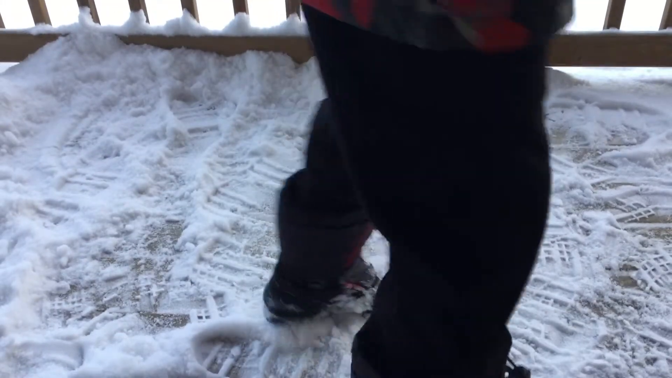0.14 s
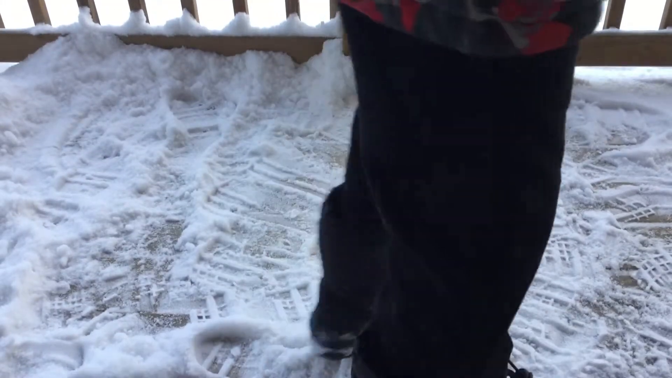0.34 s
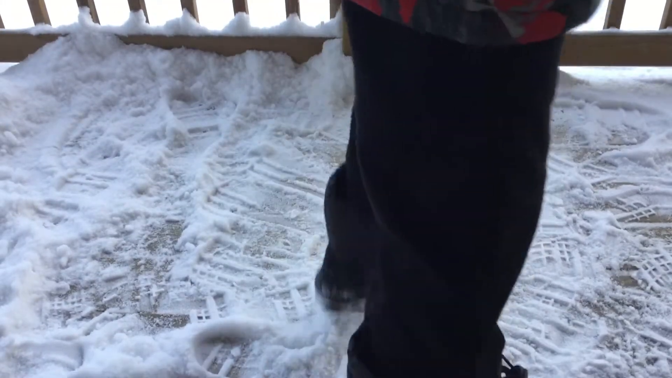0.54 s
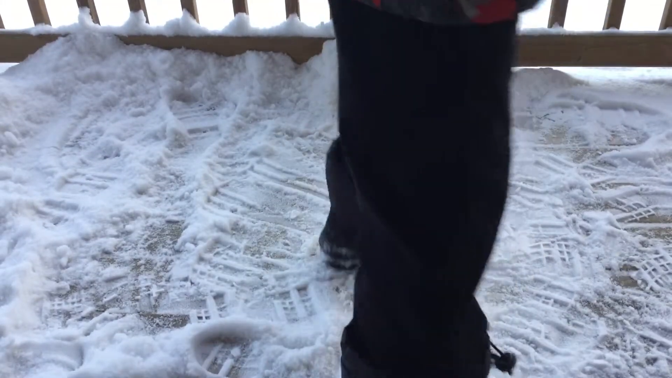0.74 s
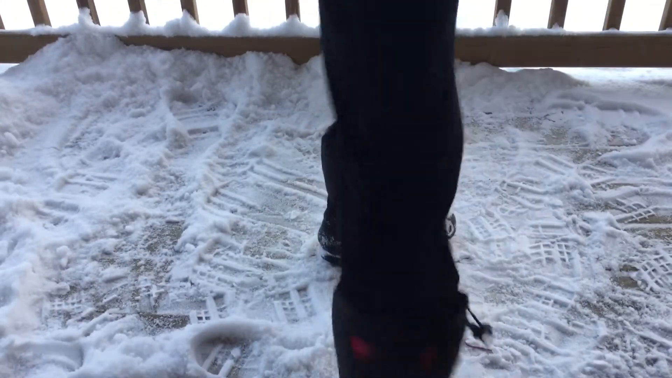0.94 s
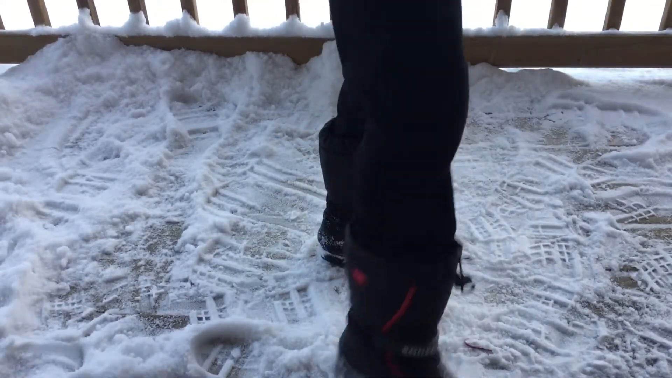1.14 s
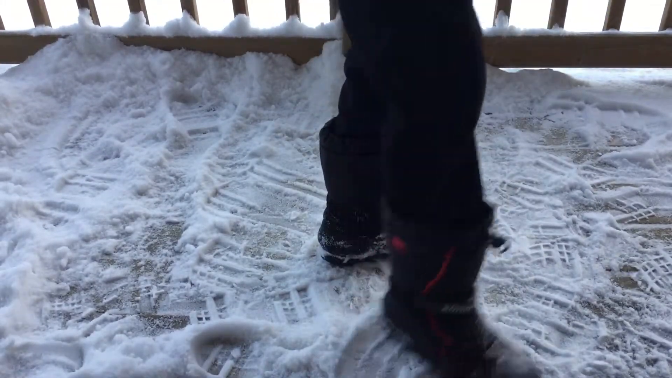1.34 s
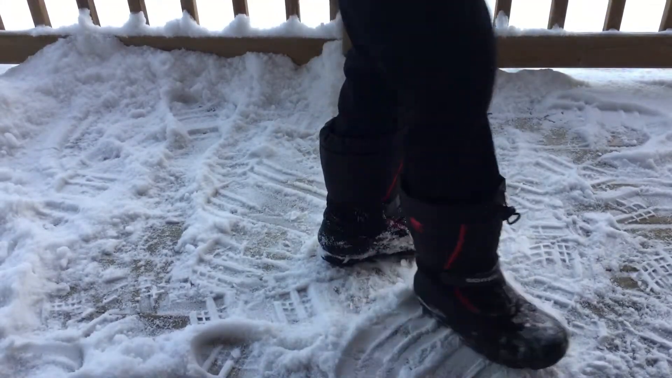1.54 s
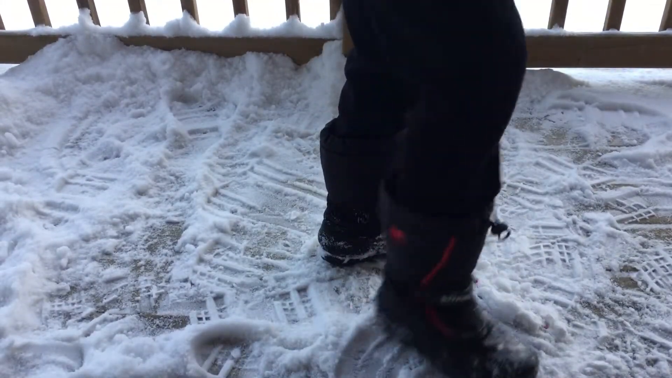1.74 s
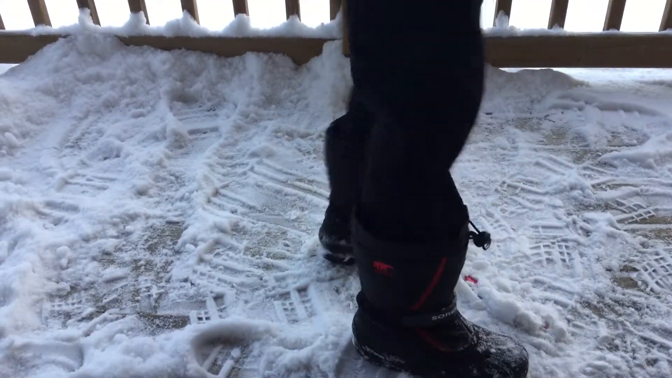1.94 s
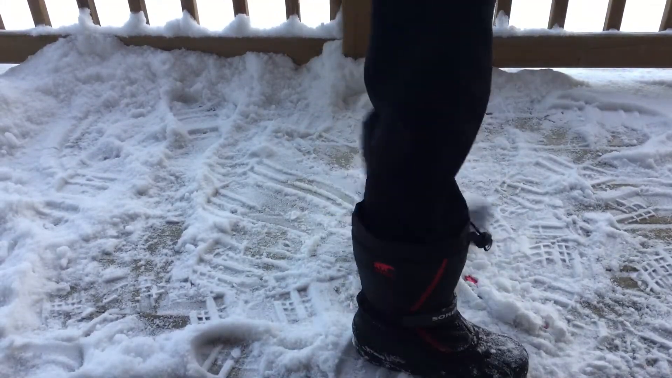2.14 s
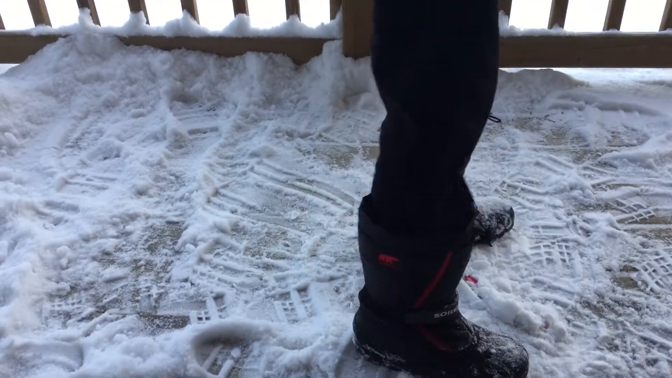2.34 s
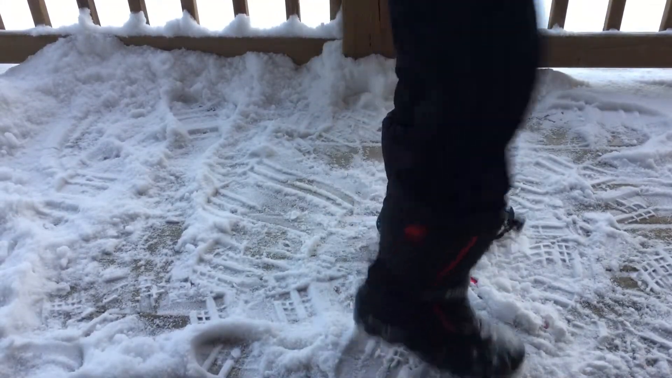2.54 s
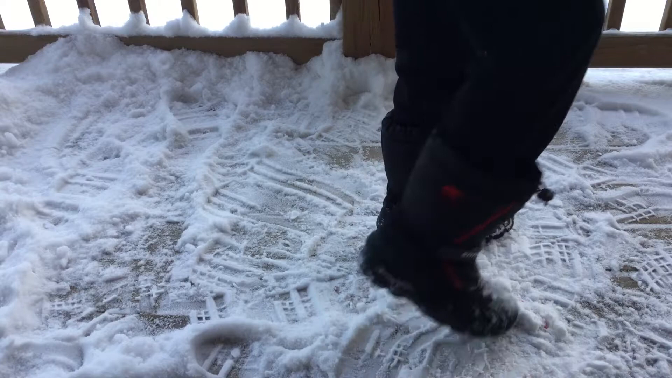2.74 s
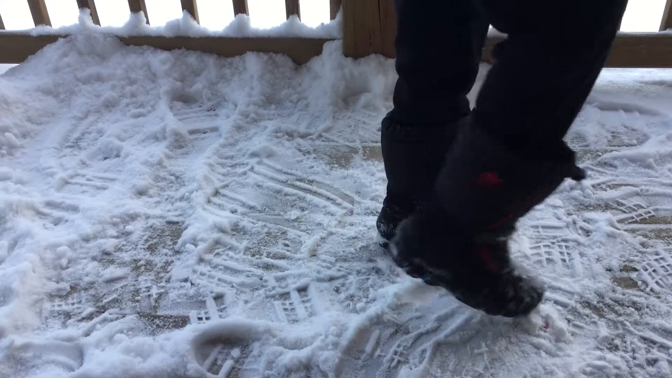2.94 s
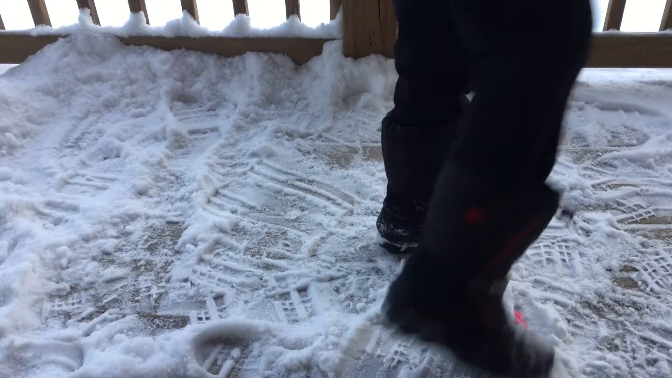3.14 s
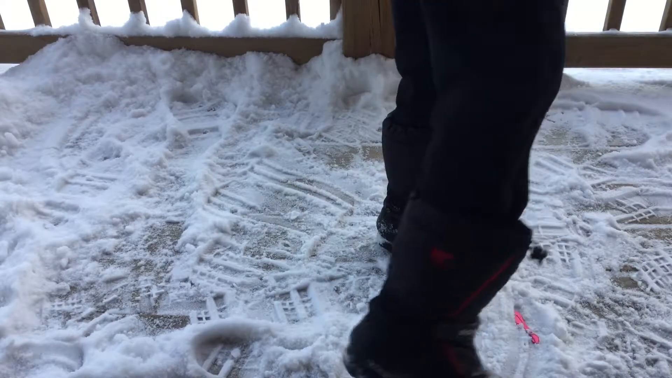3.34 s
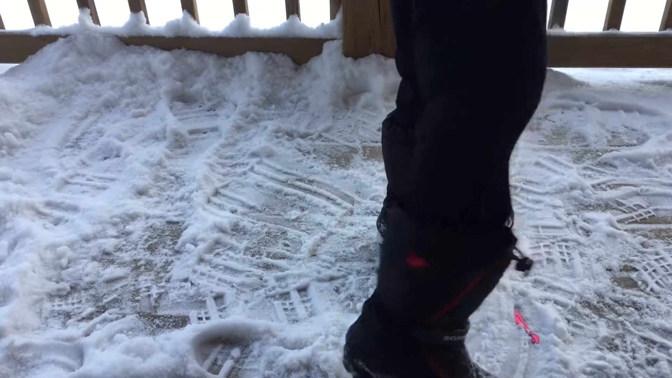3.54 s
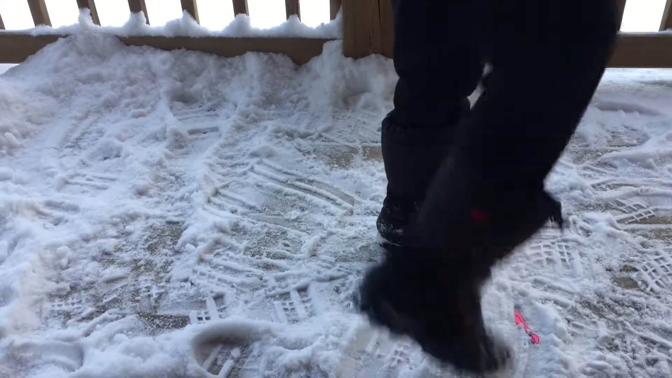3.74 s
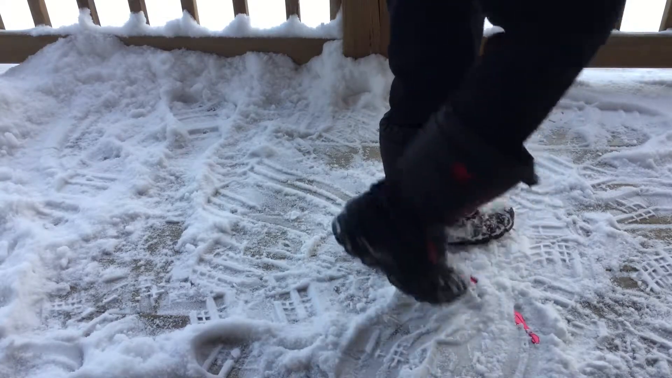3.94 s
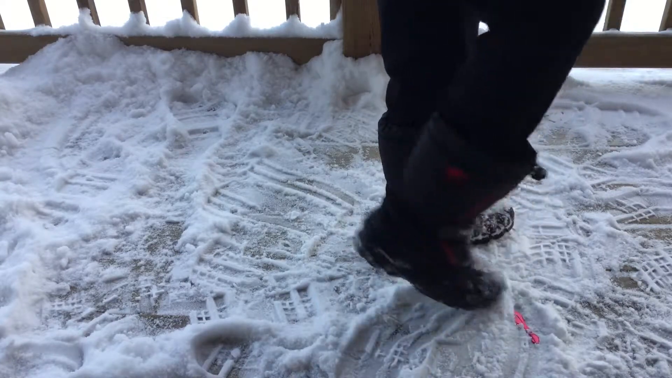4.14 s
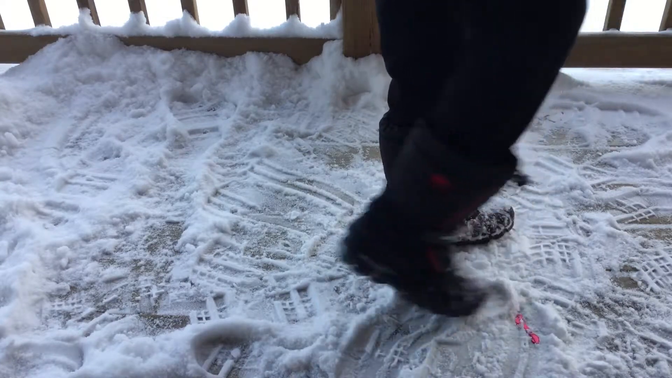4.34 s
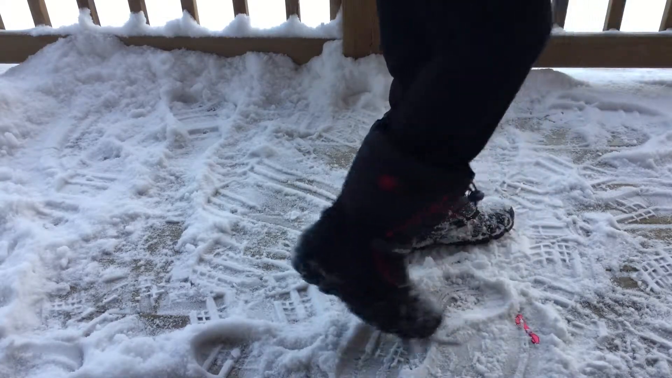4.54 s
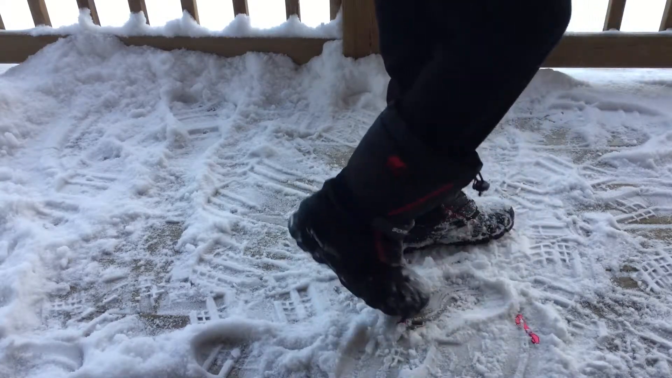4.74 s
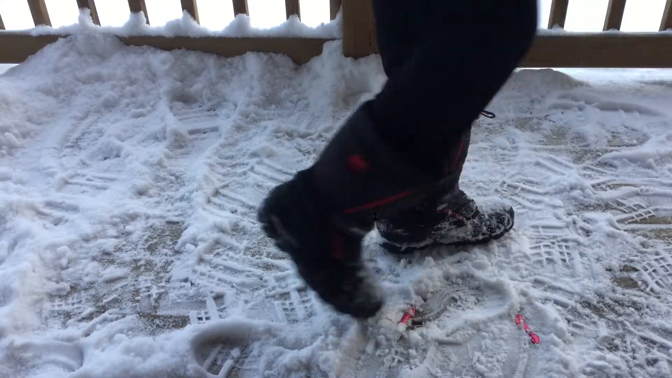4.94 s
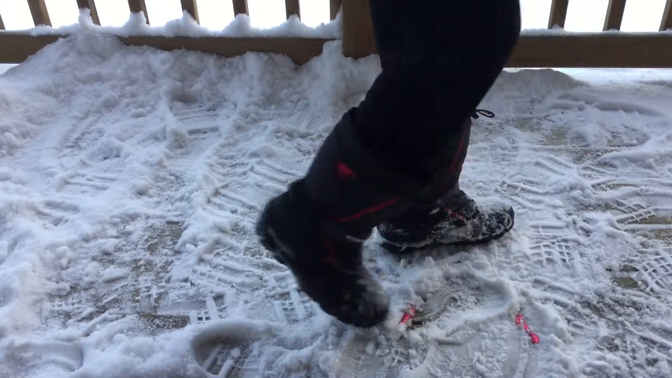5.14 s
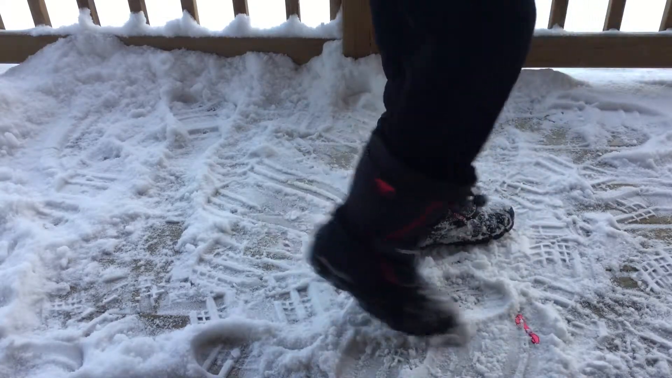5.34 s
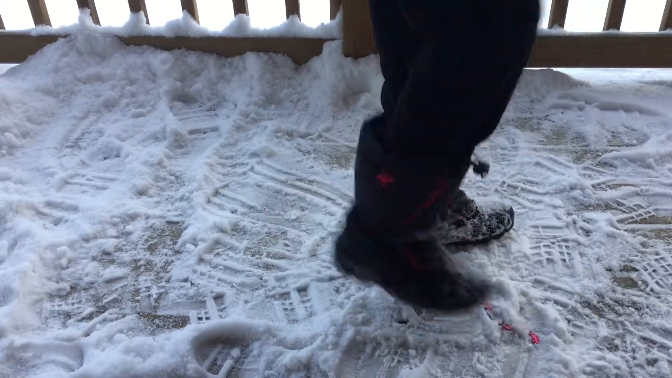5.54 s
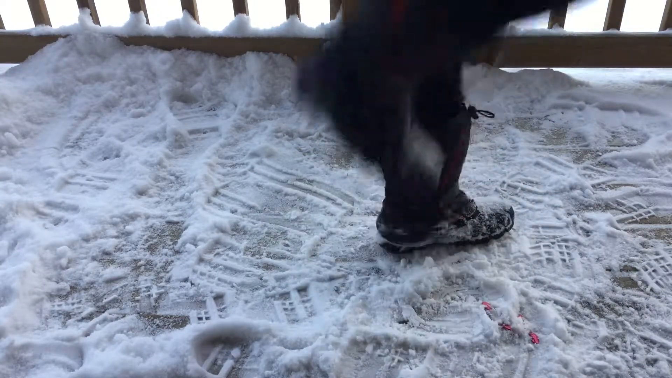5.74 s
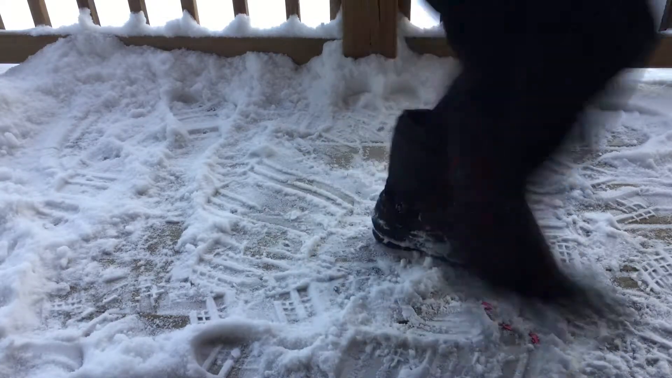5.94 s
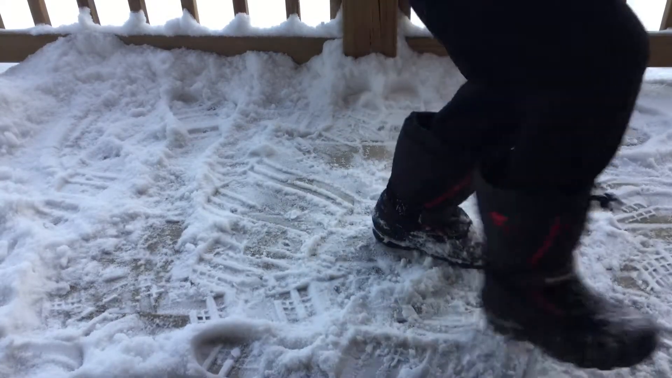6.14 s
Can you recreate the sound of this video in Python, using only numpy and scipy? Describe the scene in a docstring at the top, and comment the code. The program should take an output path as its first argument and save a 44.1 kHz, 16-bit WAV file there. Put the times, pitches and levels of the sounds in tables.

```python
"""Distant traffic rumbles throughout, as flickering noise bands, while snow boots shuffle on a snowy wooden deck.
From the first thud on, soles drag and crush snow (clumped random grains), crust snaps (short bright noise),
and footfalls ring the planks (soft pushes into decaying sines). Near 6 s the boots stamp on a small
folding knife, which clacks (short ringing modes); the stamp overloads the microphone."""
import sys
import numpy as np
from scipy import signal
from scipy.io import wavfile

SR = 44100
rng = np.random.default_rng(int(sys.argv[2]) if len(sys.argv) > 2 else 0)


def master_out(mix):
    """Clip the mix to full scale and print it as 16-bit PCM to the path in sys.argv[1]."""
    frames = np.transpose(np.atleast_2d(mix))
    ceiling = np.clip(frames, -1, 1)
    pcm = np.round(ceiling * 32767).astype(np.int16)
    wavfile.write(sys.argv[1], SR, pcm)


N = 277389

# colour of the far road noise: [f/Hz, relative density level/dB]
TRAFFIC_SPECTRUM = [(15, -37), (25, -25), (59, 3), (86, 1.5), (140, -2), (188, -7), (267, -7.5),
                    (631, -15.5), (826, -11.5), (945, -17), (1490, -23), (3530, -52), (7500, -61.5),
                    (14300, -55), (15500, -60)]
TRAFFIC_DB = -31  # level around which the traffic swells

# pushes and drags of a sole through snow: [peak t/s, swell t/s, fade t/s,
# crushing level/dB, grit level/dB, fine spray level/dB, load on the planks level/dB]
SCUFFS = [(.05, 0.019, 0.14, -30, -42.5, -38.5, -48), (.30, 0.27, 0.39, -54, -60.5, -60, -34),
          (.79, 0.28, 0.34, -41.5, -53.5, -53.5, -28.5), (.87, 0.21, 0.13, -39, -65, -55, -23.5),
          (.95, 0.081, 0.37, -34, -45, -50.5, -29.5), (1.054, 0.047, 0.29, -31.5, -41.5, -48, -33),
          (1.19, 0.28, 0.18, -34, -42, -47, -38.5), (1.39, 0.32, 0.13, -28, -39, -47.5, -31),
          (1.50, .2, 0.22, -40.5, -52.5, -49.5, -31.5), (1.894, 0.006, 0.077, -32, -45.5, -51, -32),
          (1.95, 0.094, 0.18, -36.5, -53, -52.5, -30.5), (2.06, .1, 0.047, -37, -63, -52.5, -23),
          (2.244, 0.022, 0.076, -34.5, -45, -46, -37), (2.28, 0.058, 0.034, -32, -54, -46, -33),
          (2.42, .03, 0.073, -51, -70, -63, -46), (2.57, .15, 0.13, -63, -72, -62, -51),
          (2.71, 0.13, .15, -72, -82, -61.5, -57), (3.0, 0.28, .2, -50, -64, -62, -39),
          (3.15, 0.13, 0.13, -39, -50, -51, -40), (3.215, 0.086, 0.17, -34.5, -46.5, -42.5, -31.5),
          (3.295, .08, .05, -38, -46, -58, -35), (3.36, .1, .15, -49, -62, -56, -38),
          (3.50, 0.2, 0.14, -35, -52, -53, -36), (3.718, 0.083, .06, -43, -59, -55, -38),
          (3.82, 0.19, 0.4, -44, -62, -59.5, -43.5), (4.28, 0.074, 0.24, -46, -61, -69, -30.5),
          (4.36, 0.033, .2, -38.5, -69, -70, -27.5), (4.44, 0.11, 0.23, -31.5, -40, -44, -26.5),
          (4.535, 0.12, 0.1, -36, -42.5, -40, -38), (4.631, 0.18, 0.046, -34, -52, -50.5, -25),
          (4.835, 0.025, .2, -40.5, -56, -80, -32), (4.97, .15, 0.44, -48.5, -75, -66, -37),
          (5.266, .01, 0.41, -45, -53, -50, -35), (5.395, 0.12, .1, -31, -38.5, -40, -29),
          (5.71, .2, 0.22, -43.5, -55, -52, -40), (5.90, 0.14, 0.21, -44, -47.5, -46.5, -38),
          (5.975, 0.027, 0.13, -26, -29.5, -28.5, -60), (6.05, .02, 0.11, -22.5, -39, -40, -60),
          (6.127, .01, 0.16, -43, -49, -43, -60)]
# snow and planks under standing boots: [crushing level/dB, grit level/dB, spray level/dB, load level/dB]
STANDING_LEVELS = (-52.5, -67, -87, -43)
SWELL_DB = 20  # a scuff gains this much over its swell and loses it over its fade

# colours of snow under the sole, coarse to fine: [f/Hz, relative density level/dB]
CRUSH_SPECTRUM = [(400, 4), (700, 5), (1150, 7), (1800, 2.5), (2600, -10), (4000, -42)]
GRIT_SPECTRUM = [(1800, 3), (2800, 1), (4000, -1.5), (6000, -12.5), (7500, -10.5), (9000, -21.5)]
SPRAY_SPECTRUM = [(5000, -6.5), (7400, -6), (8600, -2.5), (13000, -3), (17000, 3)]

# ringing modes of planks and joists: [f/Hz, level/dB, t60/s after a footfall]
DECK_MODES = [(33.6, -19, 0.12), (43.1, 1.5, 0.27), (53.15, 5, 0.48), (66.6, -6.5, 0.25), (85.4, -5, 0.8),
              (110.8, -4.5, 0.34), (117.5, 4, 0.45), (136.2, 4, 0.4), (158.2, 0, 0.4), (176.3, -0.5, 0.43),
              (201, 0, 0.23), (239.4, 0.5, 0.29), (292.9, 1, 0.17), (335.8, -1, 0.24), (359.8, -1.5, 0.28),
              (407.4, -3.5, 0.27), (488.3, -11.5, 0.25), (557, -5.5, 0.14), (623, -6.5, 0.31),
              (725, -6, 0.12), (830, -36, 0.41), (1010, -18, 0.36), (1157, 6.5, 0.074), (1440, -13, 0.13),
              (2000, -23, .05)]

# single crust snaps: [t/s, level/dB]
SNAPS = [(0.045, -40), (0.0697, -31), (0.797, -50), (0.852, -52), (0.909, -45), (1.045, -31), (1.1454, -43),
         (1.395, -41), (2.058, -48), (2.411, -47), (2.4214, -56), (3.289, -44), (4.0664, -56),
         (4.2832, -53), (4.4034, -37), (5.953, -25), (5.9706, -12.5), (6.037, -6), (6.127, -34)]

# footfalls: [t/s, blow level/dB, contact low-pass f/Hz, extra weight on the joists level/dB,
# snow burst level/dB, burst t60/s, board under the sole f/Hz, its knock level/dB]
FALLS = [(0.0456, -19, 252, 3.5, -25, 0.16, 130, -0.5), (0.794, -44, 400, -25, -37, .04, 297, -20),
         (0.851, -49, 400, -15, -25.5, 0.05, 276, -8.5), (1.89, -46, 300, -17, -43, 0.1, 188, -13),
         (2.057, -40, 450, -18, -42, 0.046, 315, -13.5), (2.237, -19.5, 260, -9.5, -57, 0.2, 179, -3.5),
         (2.412, -32, 603, -25, -44, .04, 341, -9.5), (3.199, -35, 300, -4, -41, 0.09, 200, -14),
         (4.437, -47, 400, -15, -26, 0.13, 244, -16), (4.618, -40, 450, -15, -48, 0.069, 370, -33),
         (4.829, -28, 300, -22, -52, 0.067, 264, -11), (5.224, -43, 200, -9, -55, .05, 113, -23.5),
         (5.325, -43, 450, -8, -28, 0.061, 297, -16), (5.954, -25, 350, -4, -15.5, 0.056, 128, -10),
         (5.971, -12, 356, -14, -8.5, 0.086, 123, -5), (6.014, -20, 119, 11, -38, 0.046, 102, -7),
         (6.035, -21, 2500, -25, -2.5, 0.044, 1022, 8.5), (6.036, -1, 710, -1.5, -7.5, 0.06, 157.4, 17)]
# colour of snow bursting under a footfall: [f/Hz, relative density level/dB]
BURST_SPECTRUM = [(300, 25.5), (1000, 7.5), (2500, -9), (5000, -9), (7600, -22), (8600, -43), (16000, -28)]
JOISTS_BELOW_HZ = 130
BENDING_S = .004  # travel time of a 100 Hz bending wave along the planks, growing as pitch falls
KNOCK_CYCLES = 11.9  # cycles in the knock's t60: boot and snow damp the loaded board

# blows on the knife under the sole: [t/s, level/dB]
KNIFE_BLOWS = [(5.953, -23), (5.9698, -13.5)]
# ringing modes of the small folding knife: [f/Hz, level/dB, t60/s]
KNIFE_MODES = [(1764, 3, 0.026), (3020, -8, 0.016), (4800, -6.5, 0.016), (6540, -8, .015)]

# narrow dip in the treble of the whole sound, and the top cut
TREBLE_DIP_HZ, TREBLE_DIP_WIDTH_HZ, TREBLE_DIP_SHARE = 7530, 700, 0.56
CUTOFF_HZ = 16050


def from_db(db):
    """Decibels to gain."""
    return 10 ** (np.asarray(db) / 20)


def rms_one(x):
    """Scale to rms 1."""
    return x / np.sqrt(np.mean(x ** 2) + 1e-20)


def filtered(x, order, hz, kind):
    """Butterworth high-pass or band-pass."""
    return signal.sosfilt(signal.butter(order, hz, kind, fs=SR, output="sos"), x)


def drift(rate_hz):
    """Slow random wander of spread 1: noise through a double one-pole low-pass."""
    step = 40  # samples between drawn points
    pole = np.exp(-2 * np.pi * rate_hz * step / SR)
    noise = rng.standard_normal(N // step + 2002)
    slow = signal.lfilter([1], [1, -2 * pole, pole * pole], noise)[2000:]  # skip the filter's start
    return np.interp(np.arange(N) / step, np.arange(len(slow)), rms_one(slow))


def ring(force, hz, t60):
    """Two-pole resonator: a unit click sets off a decaying sine of starting height 1."""
    decay = from_db(-60 / (t60 * SR))
    angle = 2 * np.pi * hz / SR
    feedback = [1, -2 * decay * np.cos(angle), decay * decay]
    return signal.lfilter([0, np.sin(angle)], feedback, force + 1e-18)


def coloured(sources, spectrum, patchy_db):
    """Third-octave bands, each with its own level and flicker; neighbours take turns on two sources."""
    out = 0
    edges = 22 * 2 ** (np.arange(30) / 3)
    hz, db = np.transpose(spectrum)
    for k, (low, high) in enumerate(zip(edges, edges[1:])):
        if high > hz[0] and low < hz[-1]:
            band = filtered(sources[k % 2], 2, [low, high], "band")
            level_db = np.interp(np.log(low * high) / 2, np.log(hz), db)
            out = out + from_db(level_db + patchy_db * drift(14.3)) * band
    return rms_one(out)


def grains(per_s, spread_db, clump_db):
    """Crystals break at random, in clumps, mostly small and a few large, as clicks of either sign."""
    size_db = spread_db * np.minimum(rng.exponential(1, (2, N)), 4)
    sizes = from_db(size_db) * rng.choice([-1, 1], (2, N))
    clumps = from_db(clump_db * drift(40))
    breaking = rng.random((2, N)) < per_s / SR
    return sizes * clumps * breaking + 1e-9


def traffic():
    """Far road noise: coloured noise, swelling slowly."""
    far = coloured(rng.standard_normal((2, N)), TRAFFIC_SPECTRUM, patchy_db=1.53)
    return from_db(TRAFFIC_DB + 2.67 * drift(1.0)) * far


def scuffing():
    """Gains of crushing, grit, spray and load: every scuff swells and fades, and their powers add."""
    step = 32  # samples between gain points
    power = np.outer(from_db(STANDING_LEVELS) ** 2, np.ones(N // step + 1))
    t = np.arange(power.shape[1]) * step / SR
    for s, swell_s, fade_s, *levels_db in SCUFFS:
        shape_db = -SWELL_DB * np.where(t < s, (s - t) / swell_s, (t - s) / fade_s)
        power = power + np.outer(from_db(levels_db), from_db(shape_db)) ** 2
    return [np.interp(np.arange(N) / SR, t, gain) for gain in np.sqrt(power)]


def sole(crushing, gritting, spraying):
    """Dragging and pressing: coarse crystals crush, fine ones spray, and both together make the grit."""
    coarse = grains(1800, spread_db=2.5, clump_db=1.43)
    fine = grains(5000, spread_db=1.5, clump_db=1.0)
    crush = coloured(coarse, CRUSH_SPECTRUM, patchy_db=1.7)
    grit = coloured(rms_one(coarse) + rms_one(fine), GRIT_SPECTRUM, patchy_db=4.0)
    spray = coloured(fine, SPRAY_SPECTRUM, patchy_db=-0.5)
    return crushing * crush + gritting * grit + spraying * spray


def rocking(load):
    """An uneven, cushioned force under the sole keeps the planks murmuring."""
    force = grains(900, spread_db=1.5, clump_db=3.5)[0]
    force = filtered(force, 2, [180, 550], "band")
    planks = 0
    for k, (hz, db, t60) in enumerate(DECK_MODES):
        # alternate signs; the rings are shorter than after a footfall
        planks = planks + (-1) ** k * from_db(db) * ring(force, hz, 0.62 * t60)
    return load * rms_one(planks)


def snaps():
    """Breaking crust: each snap is bright noise that starts at once and dies within milliseconds."""
    envelope = np.zeros(N)
    for s, db in SNAPS:
        envelope[round(s * SR)] = from_db(db)
    decay = from_db(-60 / (0.017 * SR))  # t60 of 17 ms
    envelope = signal.lfilter([1], [1, -decay], envelope + 1e-18)
    noise = signal.lfilter([1], [1, -.8], rng.standard_normal(N))  # soften the top
    return envelope * rms_one(filtered(noise, 2, 900, "high"))


def footfalls():
    """A soft blow knocks one board and rings the whole deck; the snow under the sole bursts and settles."""
    blows, settle, planks = np.zeros((len(DECK_MODES), N)), np.zeros(N), np.zeros(N)
    t = np.arange(SR // 2) / SR
    mode_hz = np.array(DECK_MODES)[:, 0]
    scatter_db = rng.normal(0, 1.5, (len(FALLS), len(DECK_MODES)))  # each fall excites the modes unevenly
    for fall, chance_db in zip(FALLS, scatter_db):
        s, blow_db, contact_hz, weight_db, burst_db, burst_t60, knock_hz, knock_db = fall
        at = round(s * SR)
        n = min(len(t), N - at)
        push = t * np.exp(-2 * np.pi * contact_hz * t)  # rubber and snow round the force off
        push = push[:n] / push.sum()
        strength = from_db(blow_db + weight_db * (mode_hz < JOISTS_BELOW_HZ) + chance_db)
        blows[:, at:at + n] += np.outer(strength, push)
        planks[at:at + n] += from_db(knock_db) * ring(push, knock_hz, KNOCK_CYCLES / knock_hz)
        onset = np.minimum(t[:n] / 0.00043, 1)
        settle[at:at + n] += from_db(burst_db - 60 * t[:n] / burst_t60) * onset
    # bending waves travel as the root of pitch, so the knock comes first and the boom follows
    travel_s = BENDING_S * np.sqrt(100 / mode_hz)
    lags = np.round(SR * (travel_s - travel_s.min())).astype(int)  # counted from the highest mode
    for blow, lag, (hz, db, t60) in zip(blows, lags, DECK_MODES):
        planks[lag:] += from_db(db) * ring(blow, hz, t60)[:N - lag]
    burst = coloured(grains(9000, spread_db=3.5, clump_db=2.0), BURST_SPECTRUM, patchy_db=1.5)
    return planks + settle * burst


def knife():
    """Handle and blade clack: clicks set short modes ringing when the sole lands on them."""
    clicks = np.zeros(N)
    for s, db in KNIFE_BLOWS:
        clicks[round(s * SR)] = from_db(db)
    return sum(from_db(db) * ring(clicks, hz, t60) for hz, db, t60 in KNIFE_MODES)


def scene():
    """Everything reaches one microphone."""
    crushing, gritting, spraying, load = scuffing()
    boots = sole(crushing, gritting, spraying) + snaps()
    deck = rocking(load) + footfalls()  # footfalls bring their snow bursts along
    return (traffic() + boots + deck + knife())[None]


def record(dry):
    """The microphone drops the deepest bass and overloads hard at full scale; the whole sound has a narrow
    dip in the treble, set ahead of the overload, and a steep top cut after it."""
    mic = filtered(dry, 2, 24, "high")
    peak = signal.iirpeak(TREBLE_DIP_HZ, TREBLE_DIP_HZ / TREBLE_DIP_WIDTH_HZ, fs=SR)
    mic = mic - TREBLE_DIP_SHARE * signal.lfilter(*peak, mic)
    overloaded = np.clip(mic, -1, 1)
    return signal.sosfilt(signal.cheby2(12, 60, CUTOFF_HZ, fs=SR, output="sos"), overloaded)


dry = scene()
out = record(dry)
master_out(out)
```